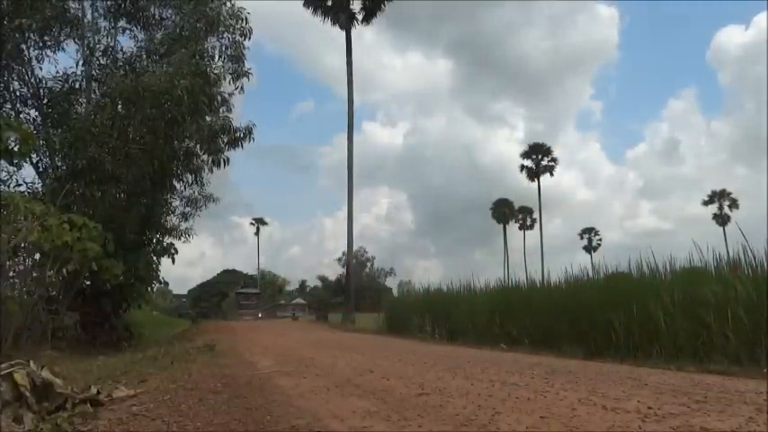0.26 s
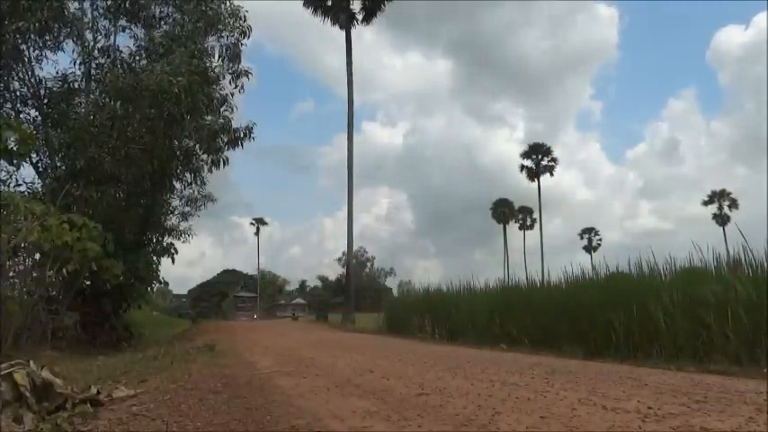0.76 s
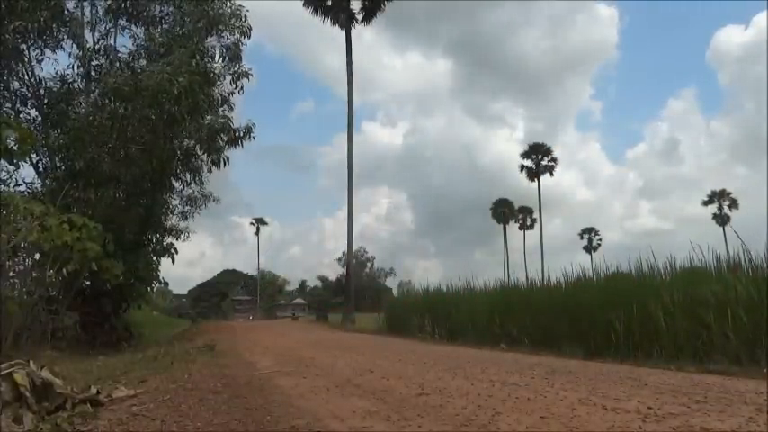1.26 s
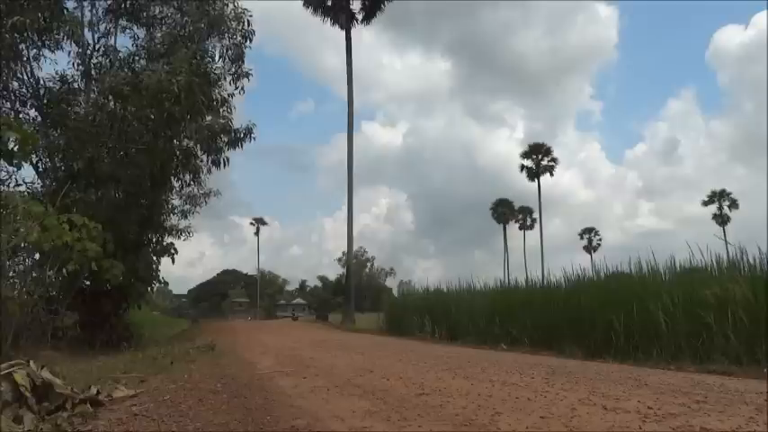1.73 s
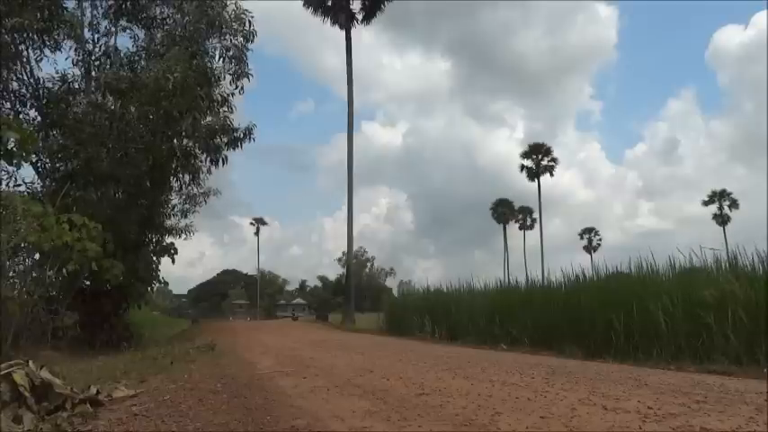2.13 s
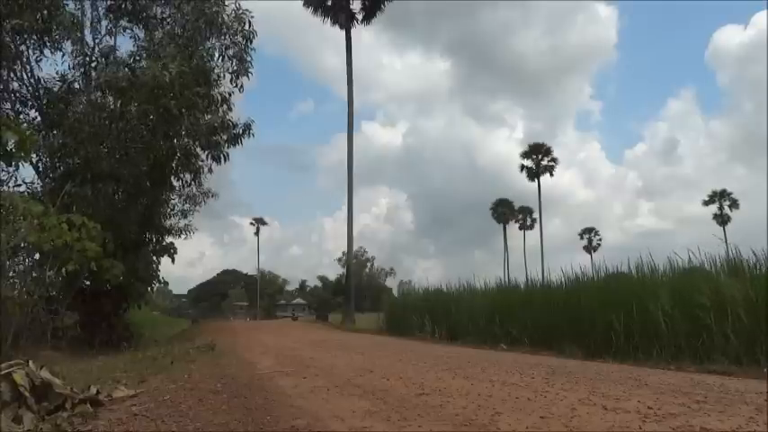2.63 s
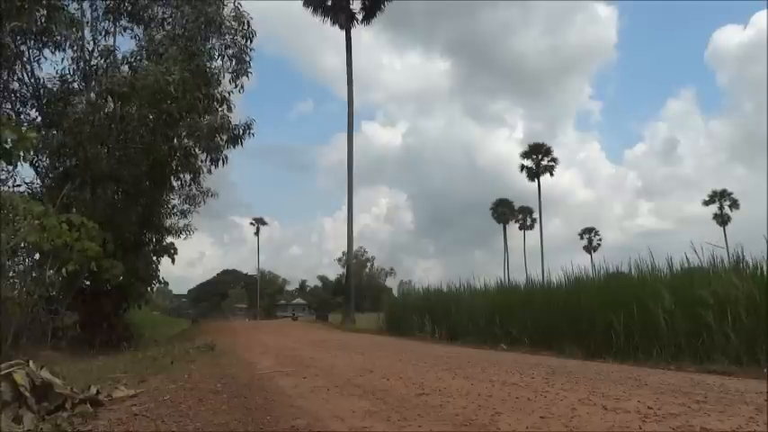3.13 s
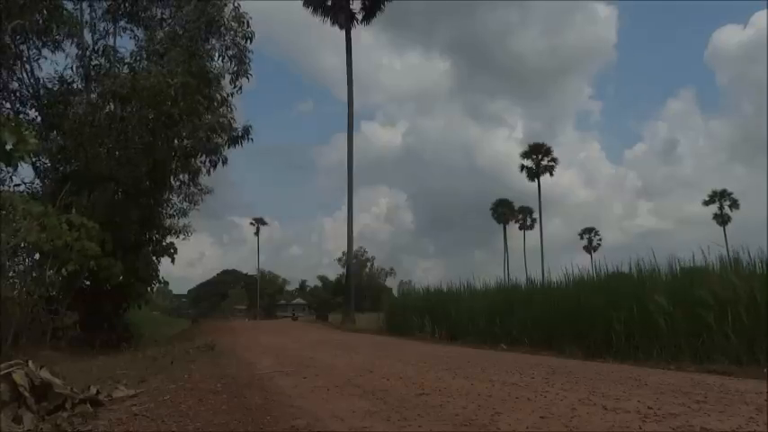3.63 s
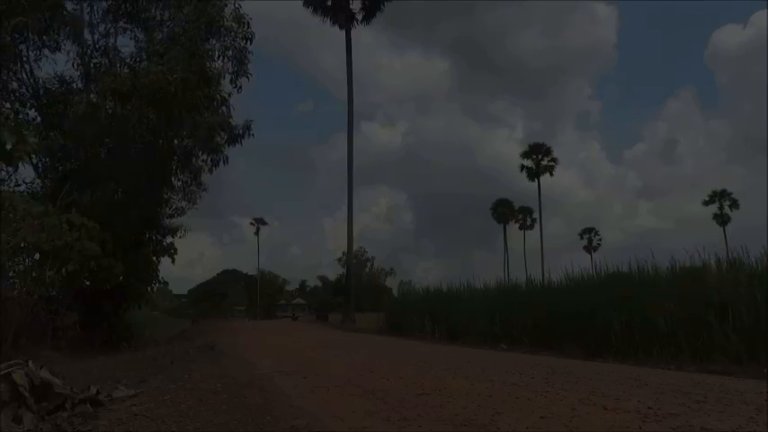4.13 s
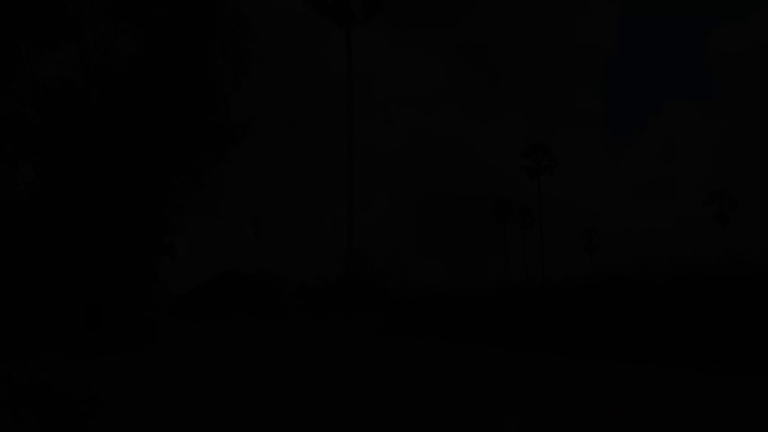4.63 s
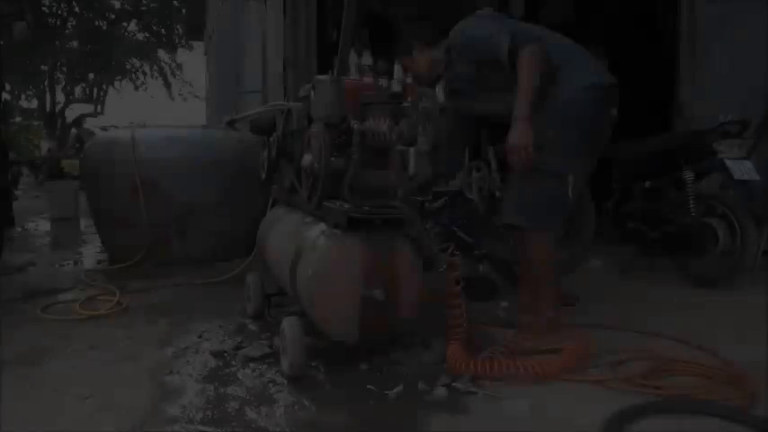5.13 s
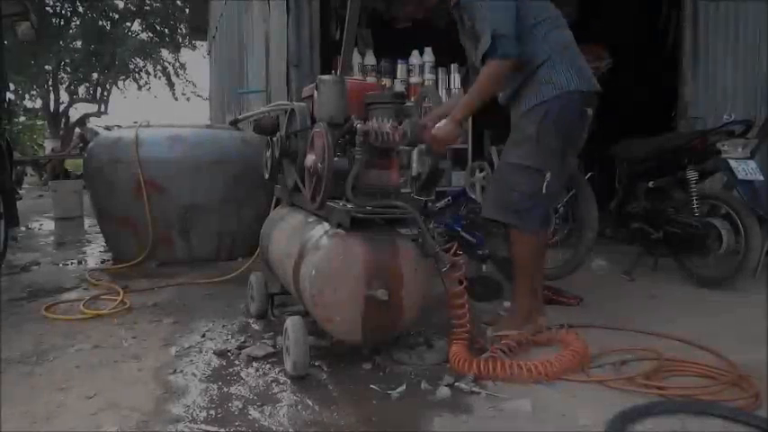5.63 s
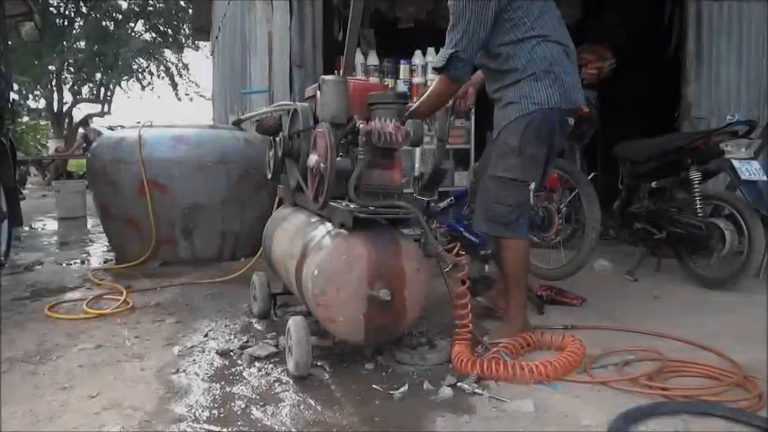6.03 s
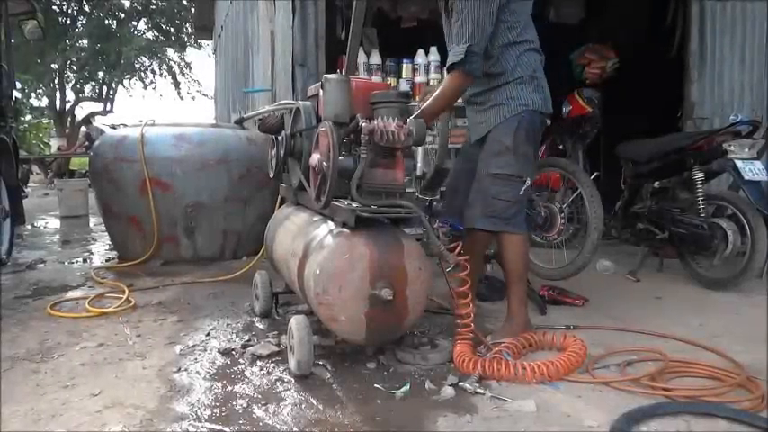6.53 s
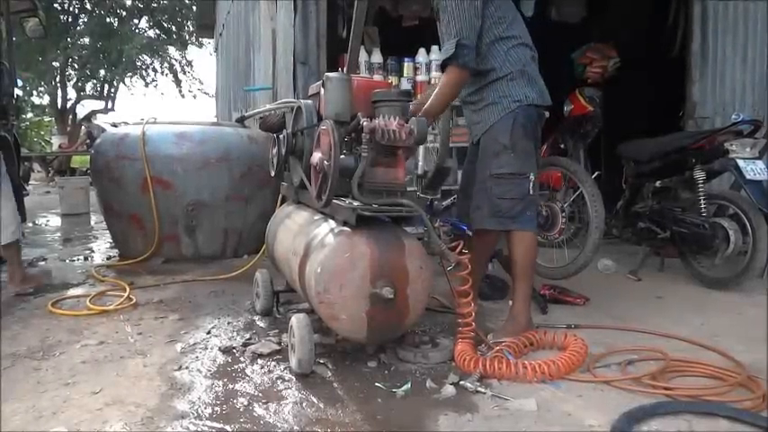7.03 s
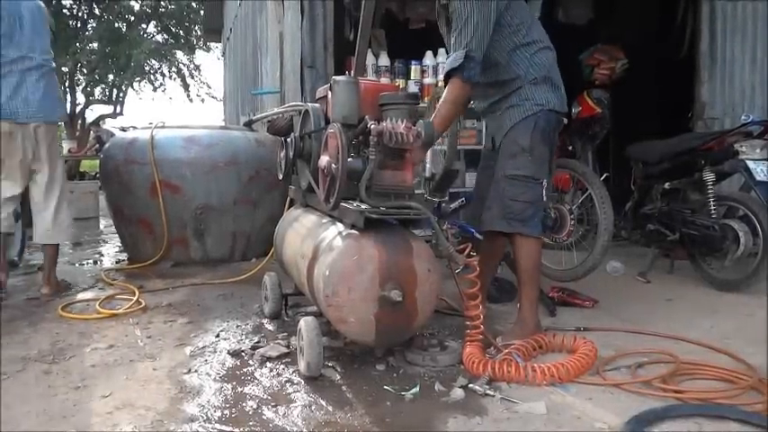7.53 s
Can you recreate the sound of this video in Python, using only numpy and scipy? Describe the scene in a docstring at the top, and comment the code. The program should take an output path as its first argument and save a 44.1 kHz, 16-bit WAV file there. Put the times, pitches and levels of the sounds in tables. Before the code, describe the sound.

Outdoors on a dirt road, a small motorbike vehicle putters away, its trailer clacking early on. Low gusts buffet the microphone hard, with soft leaf hiss and tiny bird chirps. It fades to a short silence. Then, abruptly, a close single-cylinder engine drives an air compressor in a yard, rapid and rattling, with metal clinks and a growing rush of air.

```python
"""First a motorbike tuk-tuk putters away down a dirt road: filtered clicks for the exhaust, noise for the rattle.
Its trailer clacks as ringing modes; noise gusts buffet the microphone, leaves hiss, gliding tones chirp as birds.
After a short silence, a workshop yard: close by, a single-cylinder engine drives an air compressor, made of
pulses, rumble, clatter and a growing rush of resonant noise, while a man's work clinks as struck metal modes."""
import sys
import numpy as np
from scipy import signal
from scipy.fft import rfft, irfft, next_fast_len
from scipy.io import wavfile
from scipy.ndimage import uniform_filter1d

SR = 44100
rng = np.random.default_rng(int(sys.argv[2]) if len(sys.argv) > 2 else 0)


def log_audio(samples):
    """Write samples as a 16-bit WAV file to the path given in sys.argv[1]."""
    # one column per channel
    frames = np.atleast_2d(samples).T
    # limit to full scale, then quantise
    limited = np.clip(frames, -1, 1)
    pcm = np.round(limited * 32767).astype(np.int16)
    wavfile.write(sys.argv[1], SR, pcm)


N = 343539
T = np.arange(N) / SR  # seconds

# All levels in the tables are relative; the functions trim them.
# tuk-tuk engine, slowly picking up: time_s, firings_per_s
BIKE_FIRING_RATE = [(0.6, 27.4), (1.1, 28.4), (2.0, 29.1), (4.87, 30)]
# the tuk-tuk pulls, then its sound fades out: time_s, exhaust_db, rattle_db
BIKE_LEVELS = [(0, -27, -31), (.1, -39.5, -39.5), (.35, -39, -45), (.85, -29, -37.5), (1.5, -30, -41.5),
               (2.6, -31.5, -51), (3.3, -35, -50.5), (4.87, -50.5, -56.5)]
# colour of its exhaust pipe: pitch_hz, level_db
BIKE_PIPE_COLOUR = [(25, -22.5), (55, -4), (115, 2.5), (150, -0.5), (210, -9), (270, -7), (330, -3.5),
                    (420, -7), (560, -18), (800, -27.5), (1500, -39.5), (4000, -54)]
# ringing engine casing and trailer frame: pitch_hz, width_hz, level_db
FRAME_RESONANCES = [(424, 170, 1), (600, 78, 4.5), (873, 28, 7.5), (1117, 54, -1.5), (1377, 50, 3.5),
                    (1597, 61, -2), (2070, 550, -10.5)]
# trailer clacks: start_s, level_db
TRAILER_CLACKS = [(0.506, -18.5), (0.76, -17.5), (1.185, -29)]
# ringing modes of the trailer: pitch_hz, level_db, t60_s
TRAILER_MODES = [(910, -7.5, 0.033), (1114, -4.5, .03), (1300, 0.5, 0.044), (1535, 1.5, 0.05),
                 (1700, -6, 0.068), (2140, -11, .025), (2500, -15.5, .02)]

# compressor exhaust colour: multiple_of_firing_rate, level_db
EXHAUST_ORDERS = [(1, -20.5), (2, -4.5), (3, -10), (4, 0.5), (5, 2), (6, -3), (7, -6.5), (8, -4), (9, -6),
                  (10, -2.5), (11, -7.5), (12, -11.5), (13, -10.5), (14, -14.5), (15, -27), (16, -10),
                  (17, -10), (18, -29), (19, -29), (20, -22), (21, -10.5), (22, -24)]
# bark of the exhaust valve: pitch_hz, level_db
BARK_COLOUR = [(250, -10), (500, 0), (620, -3), (810, 2), (1200, -12), (2500, -38.5)]
# shaking of the compressor frame: pitch_hz, level_db
RUMBLE_COLOUR = [(50, -30.5), (80, -4.5), (120, -1.5), (190, 0), (300, 1.5), (480, 0), (700, -1),
                 (1000, -11), (1600, -23.5), (3000, -48.5)]
# valve clatter: pitch_hz, level_db
CLATTER_COLOUR = [(500, 0.5), (1000, -0.5), (1350, 6), (1700, 1.5), (2100, -0.5), (2600, -0.5),
                  (3300, -5.5), (4500, -8.5), (6500, -11), (8800, -12), (10500, -18.5), (12500, -25),
                  (16000, -33)]
# resonances of the rushing air: pitch_hz, width_hz, level_db
AIR_RESONANCES = [(930, 83, 2.5), (1144, 118, 0), (1337, 140, -2.5), (1810, 730, -12.5)]
# rush of air and valve clatter over time: time_s, air_db, clatter_db
AIR_AND_CLATTER_LEVELS = [(5.33, -29, -24), (5.52, -28.5, -22.5), (5.68, -33.5, -28), (5.9, -24.5, -29),
                          (6.25, -31, -26), (6.8, -24, -27), (7.4, -18.5, -28), (7.62, -18.5, -28),
                          (7.79, -16.5, -29)]
# how much of the sound repeats from one cycle to the next: time_s, share_0_to_1
CYCLE_REGULARITY = [(5.33, 0.81), (6.6, 0.77), (7.2, 0.53), (7.79, 0.34)]
# metal clinks: start_s, level_db, brightest_hz
METAL_CLINKS = [(5.903, -25, 8360), (6.065, -13.5, 6800), (6.185, -28, 13200), (6.253, -27, 6900),
                (6.289, -22, 8996), (6.318, -14.5, 6260), (6.72, -23, 10960), (6.835, -20.5, 11900),
                (6.846, -16.5, 7460), (6.986, -21.5, 11100), (7.153, -16, 3592), (7.258, -21, 5000),
                (7.275, -16.5, 4450), (7.512, -2.5, 4300)]
# ringing modes of the metal: pitch_hz, level_db, t60_s
METAL_MODES = [(1437, 7, .08), (2218, -1, .09), (2579, 5, .07), (2830, -2, .12), (3214, -5, .12),
               (3521, 2, .08), (3720, -6, .08), (5184, -5, .07), (5600, -8, .15), (6697, -8, .16),
               (7488, -8, .14), (8796, -6, .08), (10086, -9, .2), (11732, -7, .15), (13540, -11, .12)]
# a fitting squeaks as it turns: start_s, length_s, start_hz, end_hz, level_db
FITTING_SQUEAKS = [(6.32, 0.1, 10150, 10000, -37.5), (6.43, 0.065, 10060, 9995, -41)]

# gusts that hit the microphone: full_force_s, hold_s, level_db
WIND_GUSTS = [(0.105, 0.36, -28), (0.504, 0.14, -23), (0.876, 0.092, -22.5), (1.936, 0.19, -16.5),
              (2.265, .11, -15), (2.45, 0.17, -16.5), (2.693, 0.053, -15.5), (2.819, .1, -21),
              (2.969, 0.15, -14.5), (3.178, 0.097, -21.5), (3.352, 0.15, -14.5), (3.727, .24, -26.5),
              (4.21, .12, -30.5), (4.6, 0.22, -34.5)]
# colour of the eddies: pitch_hz, level_db
WIND_COLOUR = [(12, -35.5), (20, -26), (80, 0.5), (109, 0), (162, -2.5), (248, -12), (321, -18),
               (584, -34.5), (782, -43.5), (867, -37), (1200, -69.5), (1560, -63), (2640, -120)]
# steady air movement between the gusts: time_s, level_db
BREEZE_LEVELS = [(0, -27), (1.2, -36.5), (1.8, -31.5), (3.6, -29.5), (4.87, -38)]
# single hard eddies: start_s, level_db, pitch_hz
HARD_BUFFETS = [(2.297, -2.5, 113), (2.335, -6.5, 294), (3.091, -10.5, 220)]
# hiss of the leaves: pitch_hz, level_db
LEAF_COLOUR = [(300, 4), (700, 6.5), (1200, -3), (2000, -3.5), (3000, -3), (4500, -1.5), (6500, -0.5),
               (8500, 0.5), (10000, -0.5), (12000, -11.5), (14000, -12), (16000, -17.5)]
# bird notes: start_s, length_s, start_hz, end_hz, level_db
BIRD_NOTES = [(0, .04, 3800, 3210, -38.5), (.16, .04, 4000, 2500, -40), (.28, .05, 5000, 3900, -41.5),
              (.48, .03, 4400, 3900, -39), (1.4, .05, 4500, 3000, -39.5), (1.52, .05, 3100, 4080, -39),
              (1.595, .05, 5050, 2700, -39.5), (2.045, .035, 3200, 4230, -40.5),
              (2.072, .035, 6000, 3190, -35.5), (2.09, .074, 6340, 5700, -43),
              (2.14, .038, 4200, 2680, -38.5), (2.218, .028, 3060, 3700, -42),
              (2.258, .04, 4000, 3200, -39), (3.005, .038, 5940, 5540, -43), (3.015, .04, 3400, 2750, -42),
              (3.938, .042, 5100, 2800, -38), (4.05, .045, 6010, 2800, -41.5)]

# stereo width of the road: pitch_hz, side_minus_mid_db
ROAD_STEREO = [(60, -28), (180, -36.5), (550, -10.5), (1650, -8), (4970, -12.5), (15000, -19.5)]
# stereo width of the wind: pitch_hz, side_minus_mid_db
WIND_STEREO = [(50, -11), (110, -9.5), (200, -8), (380, 0.5), (700, 3.5)]
# stereo width of the yard: pitch_hz, side_minus_mid_db
YARD_STEREO = [(60, -37), (130, -20.5), (290, -13), (640, -10.5), (1410, -10.5), (3100, -11.5), (6820, -10),
               (15000, -16)]

ROAD_END_S, YARD_START_S = 4.868, 5.328
# the compressor engine sags to a steady firing rate as the tank fills; SAG_S is the time constant
LOADED_HZ, EXTRA_HZ, SAG_S = 36.53, 2.4, 0.66
# its exhaust is loudest at one moment and falls off on either side; the shaking of the frame dies down
EXHAUST_DB, EXHAUST_PEAK_S, EXHAUST_FALL_DB_PER_S = -17.5, 6.06, 4  # relative level
RUMBLE_DB, RUMBLE_FALL_DB_PER_S = -11.5, 3  # relative level
GUST_ATTACK_S, GUST_RELEASE_S = 0.042, 0.034  # rise time; time constant of the dying away
BREEZE_FLUTTER_DB, BREEZE_FLUTTER_PER_S = 2, 12
# leaves and tall grass hiss evenly, then fade
LEAVES_DB, LEAVES_FADE_FROM_S, LEAVES_FADE_DB_PER_S = -36.7, 2.18, 3.5
CUTOFF_HZ = 15600


def tuk_tuk():
    """Each firing sends a soft thud from the pipe and shakes the frame; the trailer clacks on bumps."""
    exhaust_db, rattle_db = in_time(BIKE_LEVELS)
    clicks, age_s = firings(in_time(BIKE_FIRING_RATE)[0], fires_at=1.189, uneven_db=2.0)
    puff = rng.standard_normal(N) * np.exp(-age_s / 0.072)
    thuds = -colour(clicks + 0.005 * puff, BIKE_PIPE_COLOUR)
    blurred = echoes(thuds, delay_s=0.0046, direct=0.88)
    exhaust = amp(exhaust_db) * echoes(blurred, delay_s=0.015, direct=0.84)

    shaking = rng.standard_normal(N) * (0.54 + np.exp(-age_s / 0.013))
    rattle = amp(rattle_db) * resonate(shaking, FRAME_RESONANCES)

    bumps = contacts(*np.transpose(TRAILER_CLACKS), chatter_s=0.0024)
    clacks = amp(-5.0) * sum(ring(bumps, hz, t60) * amp(db) for hz, db, t60 in TRAILER_MODES)
    return exhaust + rattle + clacks


def compressor():
    """Exhaust pulses echo round the yard over a shaking frame, partly repeating valve clatter and rushing air."""
    running_s = np.maximum(T - YARD_START_S, 0)
    firing_hz = LOADED_HZ + EXTRA_HZ * np.exp(-running_s / SAG_S)
    exhaust_db = EXHAUST_DB - EXHAUST_FALL_DB_PER_S * np.abs(T - EXHAUST_PEAK_S)
    rumble_db = RUMBLE_DB - RUMBLE_FALL_DB_PER_S * running_s
    air_db, clatter_db = in_time(AIR_AND_CLATTER_LEVELS)
    share = np.clip(in_time(CYCLE_REGULARITY)[0], 0, 1)
    steady, loose = np.sqrt(share), np.sqrt(1 - share)

    clicks, age_s = firings(firing_hz, fires_at=5.4628, uneven_db=0.8)
    typical_hz = np.median(firing_hz[T > YARD_START_S])
    pipe = [(order * typical_hz, db) for order, db in EXHAUST_ORDERS]
    pulses = echoes(colour(clicks, pipe), delay_s=0.0095, direct=0.87)
    exhaust = -amp(exhaust_db + 3.5) * steady * pulses
    # the opening valve adds a short bark to every pulse
    exhaust = exhaust + amp(exhaust_db - 8.5) * steady * colour(clicks, BARK_COLOUR)

    shaking = rng.standard_normal(N) * (1.8 + 0.5 * np.exp(-age_s / 0.006))
    rumble = amp(rumble_db + 1.6) * loose * colour(shaking, RUMBLE_COLOUR)

    ticks = rms_one(rng.standard_normal(N) * amp(2.22 * drift(400)))
    valves = rms_one(scatter(clicks, t60=0.37))  # the same knocks come round on every cycle
    clatter = amp(clatter_db + 2) * colour(0.82 * ticks + 0.69 * steady * valves, CLATTER_COLOUR)

    turbulence = rng.standard_normal(N) * amp(1.8 * drift(70))
    air = amp(air_db + 0.5) * resonate(turbulence, AIR_RESONANCES)
    return (place(exhaust + handwork(), YARD_STEREO, pan_db=1.5)
            + place(rumble, YARD_STEREO, pan_db=-2.5)
            + place(clatter, YARD_STEREO, pan_db=-0.7)
            + place(air, YARD_STEREO, pan_db=-5.5))


def handwork():
    """Metal meets metal with a crack and a short chatter; each touch favours the modes near its own brightness."""
    start_s, level_db, bright_hz = np.transpose(METAL_CLINKS)
    rings = 0
    for hz, db, t60 in METAL_MODES:
        mode_db = level_db + db - 6 * np.log2(hz / bright_hz) ** 2
        rings = rings + ring(contacts(start_s, mode_db, chatter_s=0.0011), hz, t60)

    cracks = 0
    for at, db, hz in METAL_CLINKS:
        edges_hz = [hz / 9.0, min(hz * 1.9, 0.42 * SR)]
        band = signal.butter(2, edges_hz, "band", fs=SR, output="sos")
        cracks = cracks + signal.sosfilt(band, contacts([at], [db], chatter_s=0.022) + 1e-18)
    cracks = signal.sosfilt(signal.butter(2, 10500, fs=SR, output="sos"), cracks)
    return amp(-13) * rings + amp(22.5) * cracks + whistles(FITTING_SQUEAKS, waver=0.02)


def wind():
    """Eddies thump on the microphone; hard gusts shed smaller, higher eddies."""
    force = np.max([amp(db) * gust(s, hold_s) for s, hold_s, db in WIND_GUSTS], axis=0)
    eddies = colour(rng.standard_normal(N), WIND_COLOUR)
    # level out the eddies so that the gusts alone set the loudness
    eddies /= np.abs(uniform_filter1d(eddies ** 2, size=2000)) ** 0.5 + 1e-3
    slow = signal.sosfiltfilt(signal.butter(2, 170, fs=SR, output="sos"), eddies)
    hard = np.clip(force / amp(-14.0), 0, 1)
    gusts = force * (amp(-0.5) * hard * eddies + amp(1.5) * (1 - hard) * slow)

    breeze_db = in_time(BREEZE_LEVELS)[0] + BREEZE_FLUTTER_DB * drift(BREEZE_FLUTTER_PER_S)
    low_colour = [(25, -9.0), (60, 1.0), (130, -4.0), (250, -15), (600, -44.5)]  # pitch_hz, level_db
    breeze = amp(breeze_db) * colour(rng.standard_normal(N), low_colour)

    buffets = 0
    for s, db, hz in HARD_BUFFETS:
        click = amp(db) * (np.arange(N) == int(s * SR))
        buffets = buffets + ring(click, hz, t60=0.05)
    return place(gusts + breeze + buffets, WIND_STEREO, pan_db=0.0)


def gust(s, hold_s):
    """A gust rises quickly to full force at s, holds and dies away."""
    rise = np.clip(1 + (T - s) / GUST_ATTACK_S, 0, 1)
    return rise * np.exp(-np.clip((T - s - hold_s) / GUST_RELEASE_S, 0, 20))


def roadside():
    """Leaves hiss as flickering noise; birds call from the trees, blurred by the foliage."""
    leaves_db = LEAVES_DB - LEAVES_FADE_DB_PER_S * np.maximum(T - LEAVES_FADE_FROM_S, 0)
    hiss = amp(leaves_db) * colour(rng.standard_normal(N) * amp(0.8 * drift(60)), LEAF_COLOUR)
    birds = whistles(BIRD_NOTES, waver=0.04)
    return hiss + amp(-3.5) * birds + amp(-5) * scatter(birds, t60=0.2)


def firings(speed, fires_at, uneven_db):
    """One click per firing, of uneven strength, and the seconds since the latest one."""
    turns = np.cumsum(speed) / SR
    turns -= np.interp(fires_at, T, turns)
    fired = np.diff(np.floor(turns), prepend=np.floor(turns[0]))
    return fired * amp(uneven_db * rng.standard_normal(N)), turns % 1 / speed


def contacts(times, levels_db, chatter_s):
    """Each touch is a dying chatter of noise, of unit energy before its level."""
    out, t = np.zeros(N + SR), T[:SR // 8]
    for s, db in zip(times, levels_db):
        burst = rng.standard_normal(len(t)) * np.exp(-t / chatter_s)
        at = int(s * SR)
        out[at:at + len(t)] += amp(db) * burst / np.linalg.norm(burst)
    return out[:N]


def whistles(notes, waver):
    """Gliding, wavering tones that swell and fade."""
    out, wobble = np.zeros(N), drift(500)
    for s, length, start_hz, end_hz, db in notes:
        on = (T >= s) & (T < s + length)
        along = (T[on] - s) / length
        hz = start_hz * (end_hz / start_hz) ** along * (1 + waver * wobble[on])
        swell = np.sqrt(2 * np.abs(np.sin(np.pi * along)))
        out[on] += amp(db) * swell * np.sin(2 * np.pi * np.cumsum(hz) / SR)
    return out


def ring(clicks, hz, t60):
    """A unit click sets a sine ringing from height 1, falling 60 dB in t60 seconds."""
    r, w = amp(-60 / (t60 * SR)), 2 * np.pi * hz / SR
    return signal.lfilter([0, np.sin(w)], [1, -2 * r * np.cos(w), r * r], clicks + 1e-18)


def resonate(x, resonances):
    """Parallel resonances of alternating sign; unit power out."""
    out = 0
    for k, (hz, width_hz, db) in enumerate(resonances):
        r = np.exp(-np.pi * width_hz / SR)
        poles = [1, -2 * r * np.cos(2 * np.pi * hz / SR), r * r]
        out = out + (-1) ** k * amp(db) * (1 - r * r) * signal.lfilter([1, 0, -1], poles, x)
    return rms_one(out)


def colour(x, spectrum):
    """Causal (minimum-phase) filter with the given spectrum; unit power out."""
    size = 2 ** 14
    hz, db = np.transpose(spectrum)
    grid = np.log(np.fft.rfftfreq(size, 1 / SR) + 1)
    # beyond the outermost points the spectrum keeps falling
    outside = np.maximum(np.log(hz[0]) - grid, 0) + np.maximum(grid - np.log(hz[-1]), 0)
    cepstrum = irfft(np.log(amp(np.interp(grid, np.log(hz), db) - 20 * outside)))
    # folding the cepstrum forward in time makes the filter causal
    cepstrum[1:size // 2] *= 2
    cepstrum[size // 2:] = 0
    impulse = irfft(np.exp(rfft(cepstrum)))
    return rms_one(signal.oaconvolve(x, impulse)[:N])


def scatter(x, t60):
    """Many small reflections that die away; roughly keeps the power."""
    t = T[:SR // 2]
    tail = rng.standard_normal(len(t)) * np.exp(-np.log(1000) * t / t60)
    return signal.oaconvolve(x, tail / np.linalg.norm(tail))[:N]


def echoes(x, delay_s, direct):
    """A reflection that returns again and again (all-pass): blurs a pulse without changing its colour."""
    size = next_fast_len(N + SR // 2)
    late = np.exp(-2j * np.pi * np.fft.rfftfreq(size, 1 / SR) * delay_s)
    return irfft(rfft(x, size) * (direct - late) / (1 - direct * late), size)[:N]


def place(x, width, pan_db):
    """Direct sound in the middle, and a diffuse part whose phase wanders between the ears."""
    size = next_fast_len(N)
    hz, db = np.transpose(width)
    grid = np.log(np.fft.rfftfreq(size, 1 / SR) + 1)
    side = rfft(x, size) * amp(np.interp(grid, np.log(hz), db))
    phase = np.cumsum(drift(150)) * 2 * np.pi * 45 / SR
    side = np.cos(phase) * irfft(side, size)[:N] + np.sin(phase) * irfft(1j * side, size)[:N]
    return np.array([(x + side) * amp(pan_db / 2), (x - side) * amp(-pan_db / 2)])


def in_time(rows):
    """Each column of a curve at every sample."""
    s, *columns = np.transpose(rows)
    return [np.interp(T, s, c) for c in columns]


def drift(rate):
    """Slow chance: random knots of spread 1, rate of them per second, joined by lines."""
    knots = rng.standard_normal(4000)
    return np.interp(T * rate, np.arange(len(knots)), knots)


def amp(db):
    """Decibels to gain."""
    return 10 ** (np.asarray(db) / 20)


def rms_one(x):
    """Scale to unit power."""
    return x / np.sqrt(np.mean(x ** 2) + 1e-20)


def scene():
    """The road, a silent gap, then the yard."""
    road_fade = np.clip((ROAD_END_S - T) / 0.026, 0, 1)
    yard_fade = np.clip((T - YARD_START_S) / 0.024 + 0.5, 0, 1) ** 2
    road = place(tuk_tuk() + roadside(), ROAD_STEREO, pan_db=1.0) + wind()
    return road_fade * road + yard_fade * compressor()


def record(dry):
    """The highest peaks are rounded and the top is cut."""
    rounded = dry / (1 + dry ** 6) ** (1 / 6)
    return signal.sosfilt(signal.ellip(12, 0.1, 100, CUTOFF_HZ, fs=SR, output="sos"), rounded)


dry = scene()
out = record(dry)
log_audio(out)
```